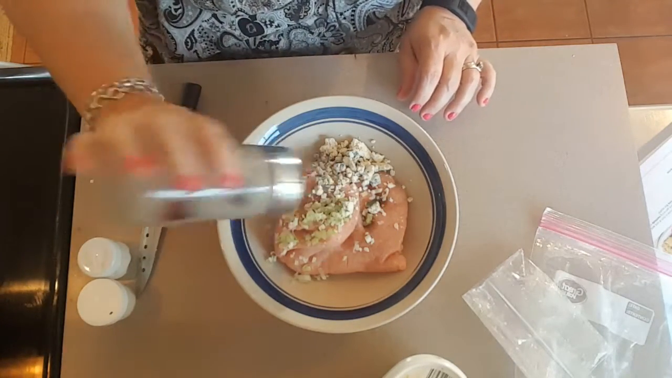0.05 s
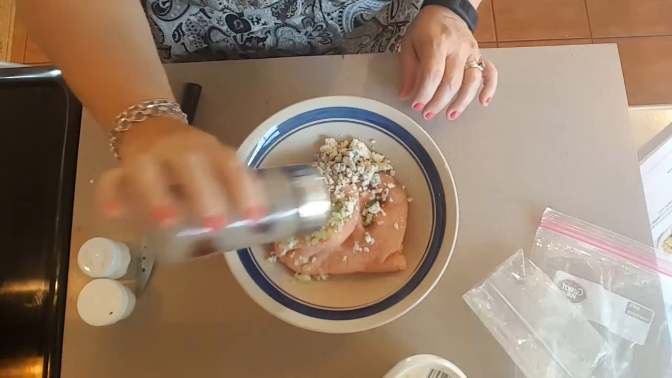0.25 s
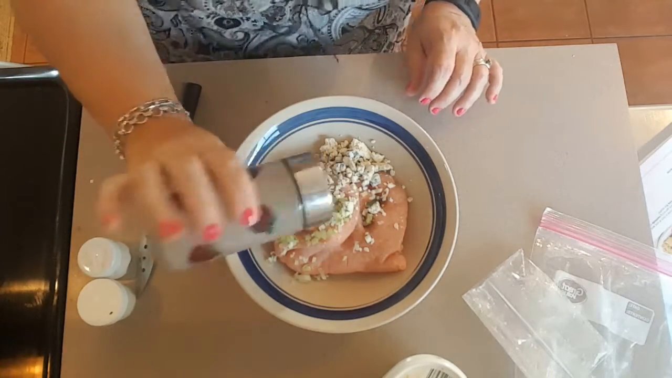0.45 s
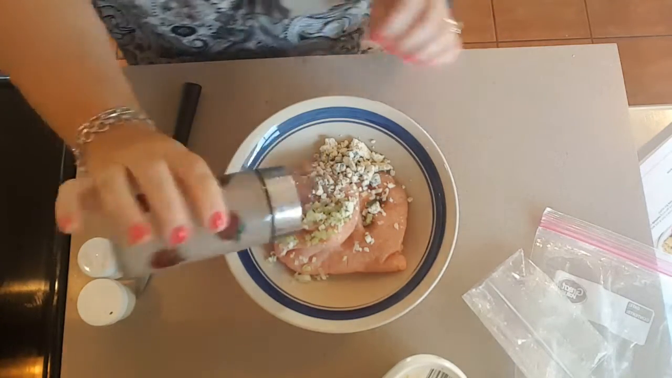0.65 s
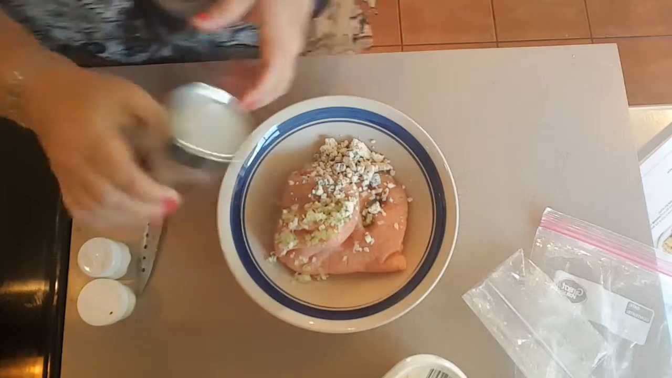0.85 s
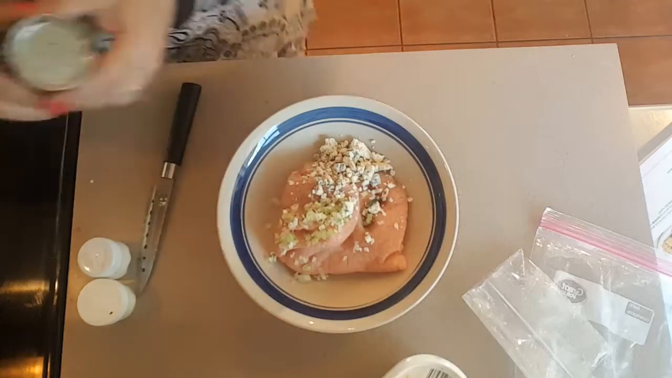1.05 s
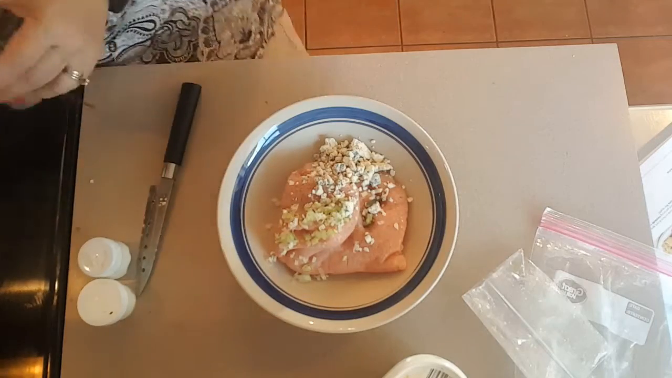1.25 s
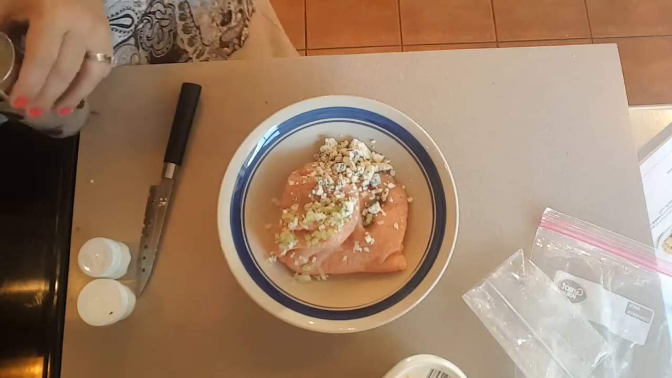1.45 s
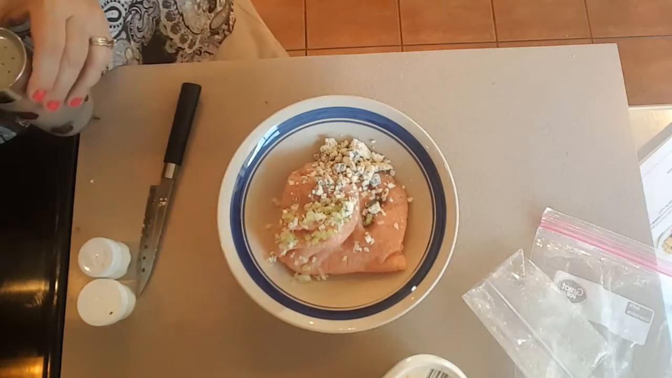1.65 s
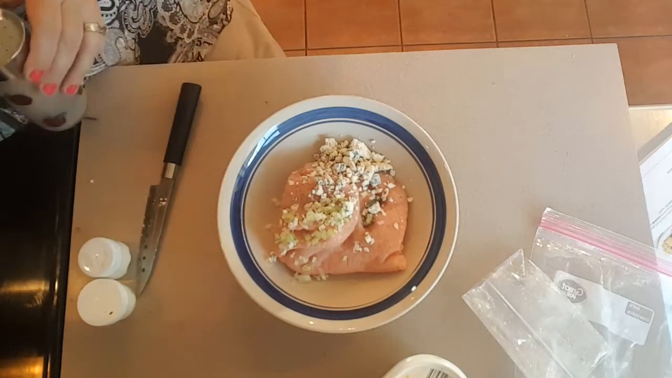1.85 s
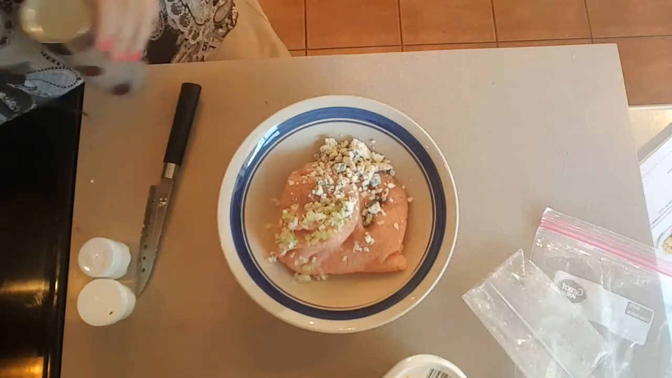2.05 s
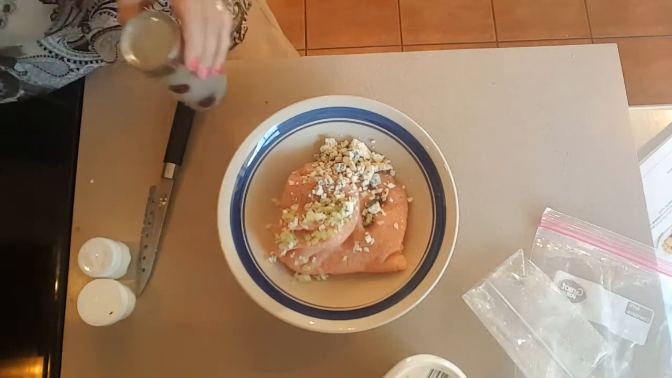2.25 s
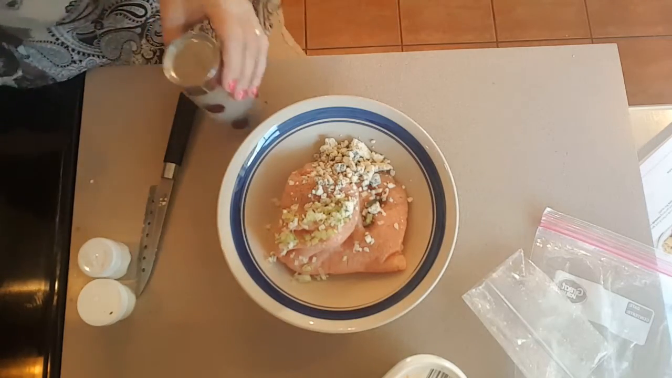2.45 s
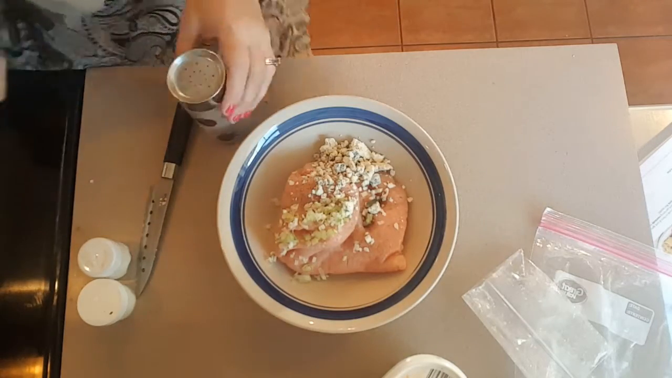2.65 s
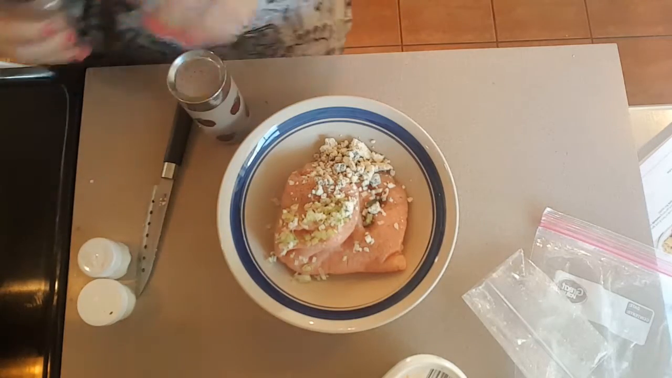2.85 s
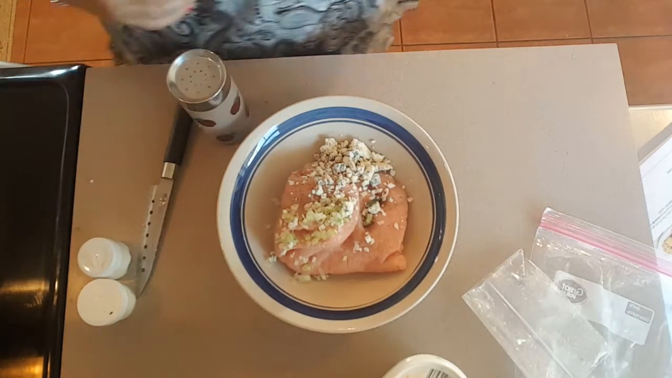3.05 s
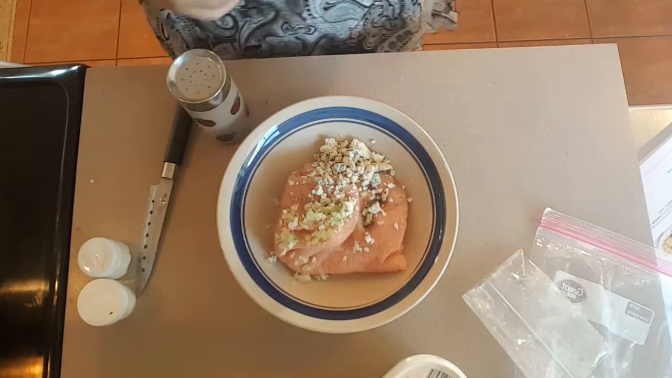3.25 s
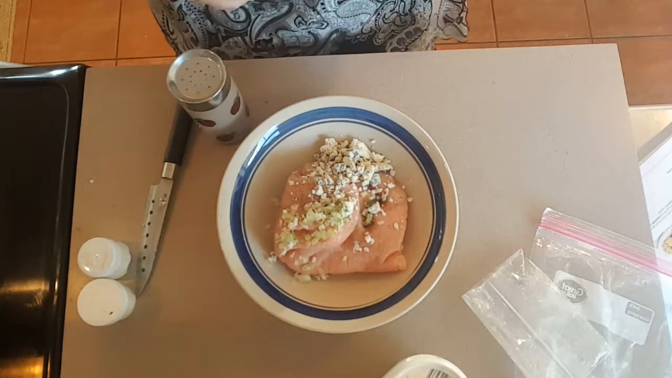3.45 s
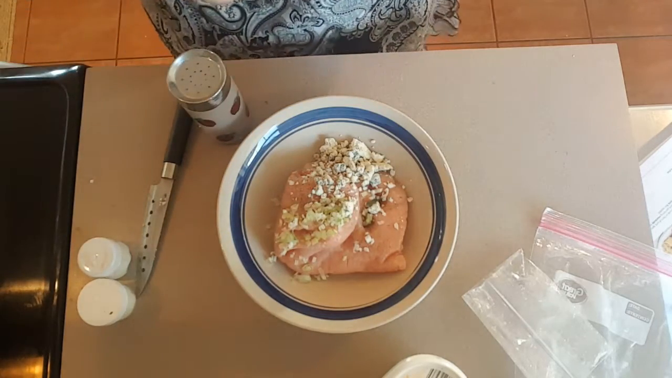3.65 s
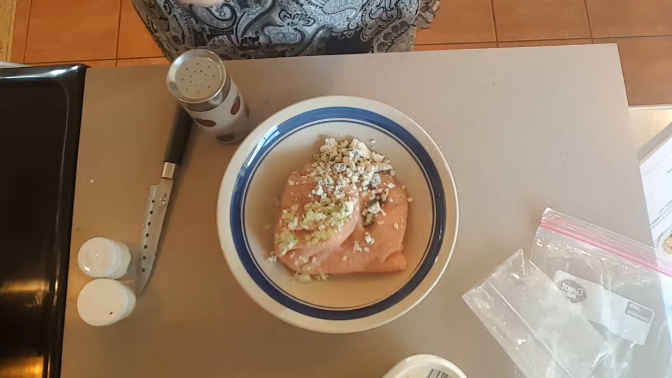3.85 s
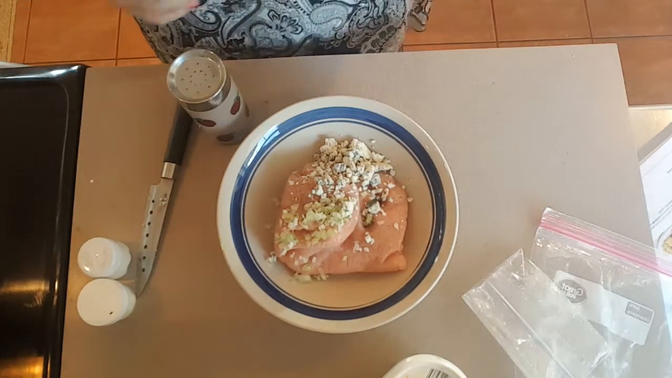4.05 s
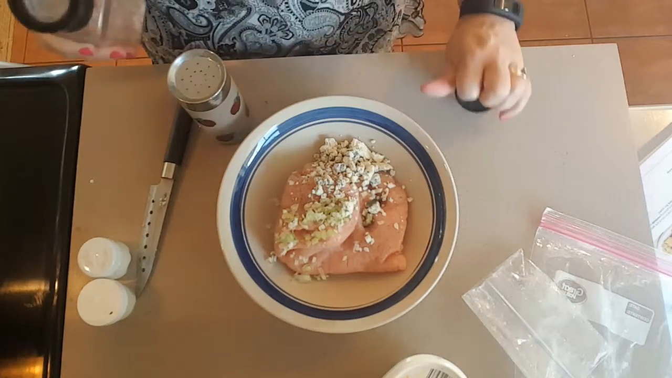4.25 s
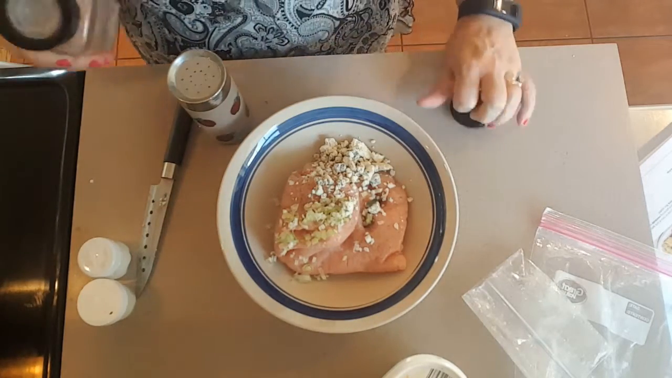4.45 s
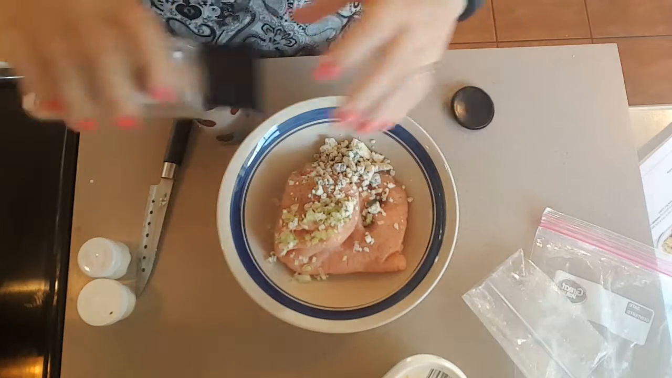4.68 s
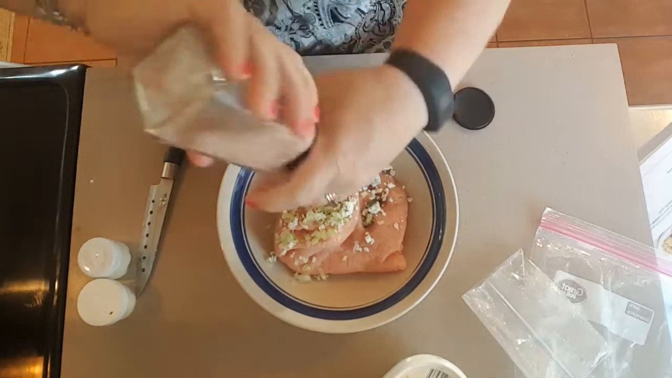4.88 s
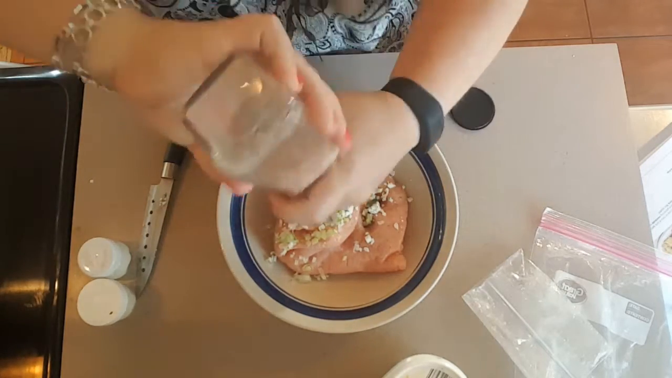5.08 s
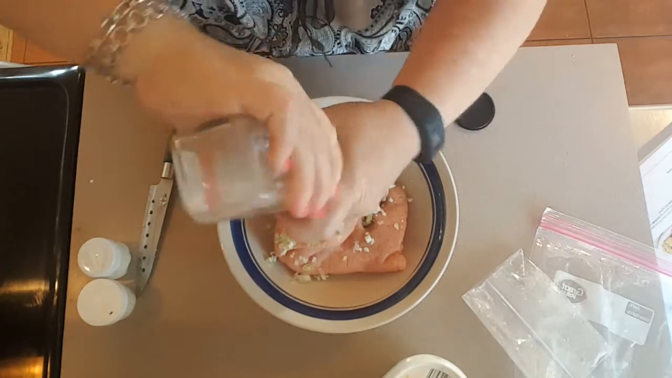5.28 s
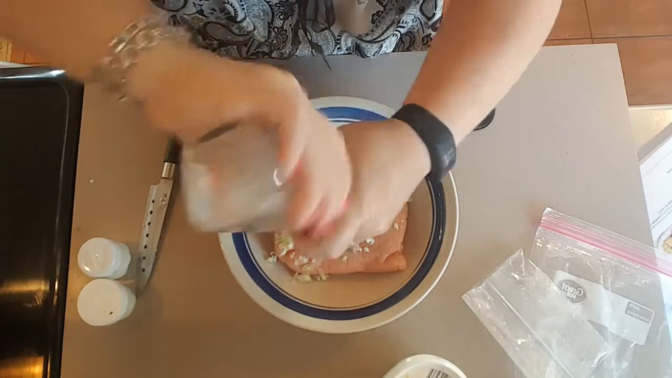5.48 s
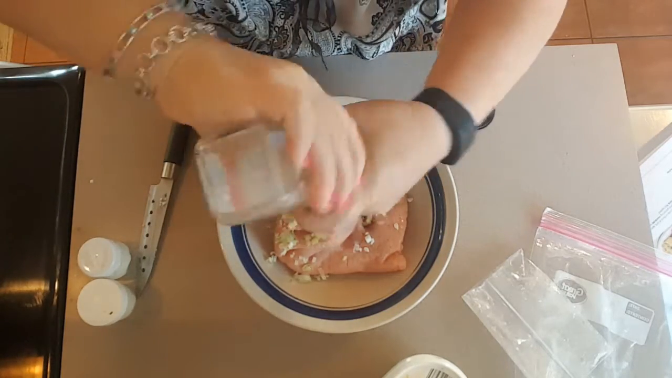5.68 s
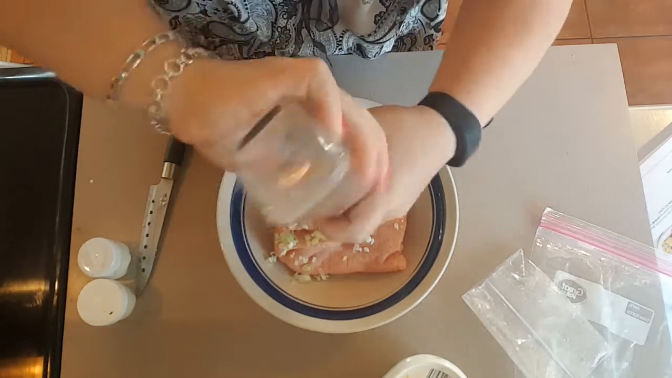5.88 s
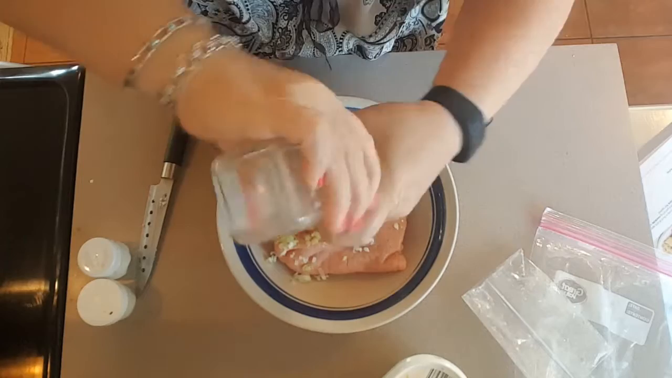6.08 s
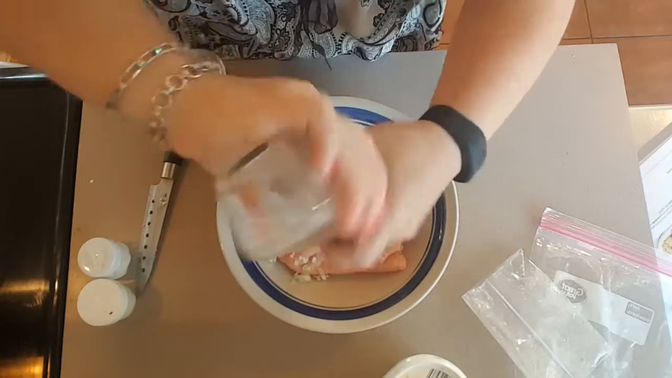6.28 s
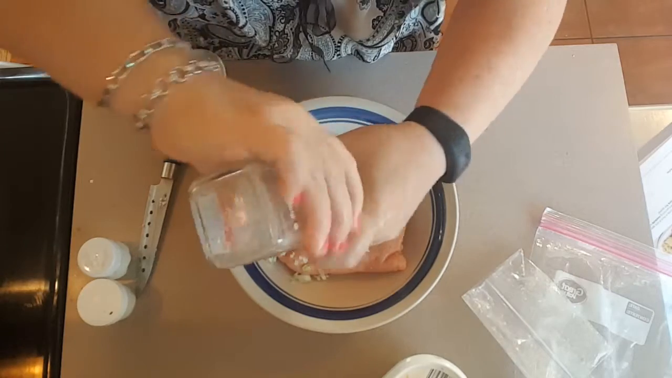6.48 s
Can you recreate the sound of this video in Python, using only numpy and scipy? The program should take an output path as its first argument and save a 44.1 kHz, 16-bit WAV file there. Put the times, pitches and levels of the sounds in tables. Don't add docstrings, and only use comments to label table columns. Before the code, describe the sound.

Faint salt shakes, a short lid scrape and a solid thud on the counter, then a plastic cap drops, peppercorns rattle and a mill crunches.

```python
import sys
import numpy as np
from scipy import signal
from scipy.fft import rfft, irfft, next_fast_len
from scipy.io import wavfile
from scipy.ndimage import uniform_filter1d

SR = 44100
rng = np.random.default_rng(int(sys.argv[2]) if len(sys.argv) > 2 else 0)


def store_wav(level_fs):
    pcm = np.round(np.clip(np.atleast_2d(level_fs), -1, 1) * 32767)
    wavfile.write(sys.argv[1], SR, pcm.T.astype(np.int16))


def decibels_to_gain(level_db):
    exponent = np.asarray(level_db, float) / 20
    return 10 ** exponent


N = 287752
TIME = np.arange(N) / SR
HZ = np.fft.rfftfreq(2 * next_fast_len(N // 2 + SR // 4, True), 1 / SR)

# frequency in Hz, level in dB.
AIR_TONE = [(15, -73), (25, -18.5), (43, -19), (64, 3), (80, -9.5), (94, -0.5), (114, -2), (185, -7),
            (293, -22), (516, -16.5), (840, -25.5), (1790, -29), (2050, -24.5), (2280, -28), (8000, -38),
            (10500, -43), (16000, -38.5)]
AIR_DB = -58
# frequency in Hz, width in Hz, level in dB.
HUMS = [(55.9, 10.7, -68.5), (119.7, 14.6, -67), (558, 110, -76)]
# start in seconds, attack in seconds, hold in seconds, release in dB per second, level in dB.
DRONE = (4.84, .1, .15, 8, -60)
DRONE_END_S = 5.75
# start, attack and hold in seconds, release in dB per second, level in dB.
SLEEVE_STIR = (-.3, .9, 6., 100, -65)
# start in seconds, level in dB.
BRUSHES = [
    (1.919, -58),
    (4.68, -51.5),
    (4.86, -56.5),
    (5.3, -59),
    (6.36, -73),
]
BRUSH_ATTACK_S, BRUSH_HOLD_S, BRUSH_RELEASE_DB_S = .06, .04, 110
# start in seconds, level in dB.
FINGERS = [(1.84, -58.5), (2.93, -65.5), (3.06, -67), (3.319, -61.5), (3.53, -61), (3.69, -67.5),
           (3.86, -64.5), (4.0, -85), (4.17, -79)]
# start in seconds, level in dB.
SQUEAKS = [(3.3, -63), (3.99, -74), (4.05, -72), (4.16, -65)]
# frequency in Hz, time to fade by 60 dB in seconds.
ROOM_FADE = [(125, 0.21), (500, 0.55), (2000, 0.42), (6000, 0.57), (10000, 0.25), (14000, 0.24)]
# frequency in Hz, left minus right in dB.
PORTS = [(60, -1.5), (200, -2), (400, -2.5), (700, -3), (1300, 1), (2400, 1), (4400, -8.5), (8000, -1.5),
         (15000, -7.5)]
PORT_BASS_RAD = 0.11

# start in seconds, can ring in dB, length in seconds, hiss over ring in dB.
SHAKES = [
    (0.174, -59, 0.038, 1),
    (0.384, -62, 0.039, 8),
    (0.596, -61, 0.028, 6),
    (0.762, -62, 0.037, -5),
    (1.053, -64, 0.021, 2),
]
# frequency in Hz, level in dB.
SALT_TONE = [(1180, -47), (2000, -28), (3200, -14), (3460, 11), (4300, -29), (4690, -6), (5250, -9),
             (13100, -11), (16000, -9.5)]
# time in seconds, level in dB.
LID_TWIST = [
    (1.865, -54),
    (1.876, -56),
    (1.889, -34.5),
    (1.907, -30.5),
    (1.96, -55),
]
# frequency in Hz, level in dB.
LID_TONE = [(59, -48), (100, -19), (206, 3), (295, -31.5), (343, 0.5), (389, -18), (608, -2.5), (850, -13),
            (1120, -5.5), (1350, -12), (1900, -9), (2250, -17.5), (2800, -24), (3500, -19.5), (4300, -31.5),
            (16000, -57)]
# time in seconds, peak in dB.
SET_DOWN = [(2.5547, -6.5), (2.559, -10), (2.5635, -14.5), (2.572, -11), (2.586, -17.5), (2.591, -13.5),
            (2.597, -17), (2.612, -17.5), (2.678, -24), (2.684, -22.5)]
# frequency in Hz, level in dB, time to fade by 60 dB in seconds.
COUNTER_RING = [(135.2, 9, 0.25), (204, -5.5, 0.14), (415, -1, 0.3), (464, -15, 0.19), (524.7, -4, 0.33),
                (571.5, -4, 0.38), (608.6, 2, 0.29), (744, -3, 0.12), (778, 0, 0.15), (922, -20, 0.033),
                (1070, -5, 0.24), (1098, -27.5, 0.092), (1190, -16.5, 0.18), (1406, -8, .08)]
# frequency in Hz, level in dB.
THUD_TONE = [(24, -49), (40, -40), (75, -11), (100, 0.5), (135, 9.5), (200, -6), (300, -20), (392, -6),
             (585, -3), (873, -6), (1090, -4.5), (1550, -16), (1760, -20), (2260, -29), (4340, -37),
             (16000, -75)]
# time in seconds, peak in dB.
LET_GO = [(2.784, -29.5), (2.803, -38), (2.812, -30), (2.822, -40), (2.833, -39), (2.877, -51)]

# time in seconds, cap knock in dB, tick in dB, left minus right in dB.
TOUCHES = [(2.966, -49.5, -63, -2), (3.1043, -79, -49, -1), (3.127, -76, -53.5, -11), (3.174, -80, -59, -7),
           (3.4271, -14, -51.5, 0), (3.566, -67, -60, 1), (3.715, -49, -68, 9), (3.7228, -31, -51, 1),
           (3.7522, -58, -58, -1), (3.77, -37.5, -52, 0), (3.882, -38, -63, 0), (3.8839, -26.5, -51, 2),
           (3.896, -46, -78, -3), (3.925, -49, -70, 0)]
# frequency in Hz, level in dB, time to fade by 60 dB in seconds.
CAP_POP = [(2073, -0.3, 0.037), (2356, -1, 0.018), (2730, -16, 0.01), (2990, -1.5, 0.0073),
           (1270, -10, 0.055)]
# frequency in Hz, width in Hz, level in dB.
TICK_TONES = [(3700, 380, 0.5), (6100, 1300, -2.5), (8460, 1700, -4.5), (12360, 5700, -20)]
# time in seconds, peak in dB.
THUMPS = [
    (2.965, -65),
    (3.4273, -38),
    (3.7221, -37),
    (3.753, -47),
]
# time in seconds, peak in dB.
HOLLOW_POPS = [
    (3.427, -36.5),
    (3.7233, -60),
    (3.7716, -73),
]
# time in seconds, peak in dB.
NAIL_CLICKS = [
    (3.7515, -41),
    (3.767, -41.5),
]
# time in seconds, peak in dB.
CREAKS = [(3.459, -44), (3.5, -50), (3.521, -55), (3.545, -58), (3.582, -62), (3.632, -52), (3.76, -50),
          (3.772, -57), (3.8, -65)]

# time in seconds, peak in dB.
LANDING = [
    (4.347, -19.5),
    (4.3509, -29.5),
    (4.357, -30),
]
# frequency in Hz, level in dB, time to fade by 60 dB in seconds.
CAP_RING = [(760, 0.5, 0.019), (1930, -9, 0.029), (2240, 13.5, 0.0078), (2570, 5.5, 0.012),
            (2740, 6.5, 0.018), (2890, 2, 0.039), (2980, -17, 0.027), (4030, -4.5, 0.017),
            (4484, 0.5, 0.03), (6320, -11, 0.021), (7200, -27, .018)]
# frequency in Hz, level in dB.
RIM_TONE = [(88, -22), (150, -0.5), (303, -10), (494, 0.5), (888, -3), (1420, -1), (1830, -12),
            (2980, -14.5), (3290, -17.5), (5910, -23.5), (6770, -26), (16000, -46)]
# time in seconds, peak in dB, length in seconds.
WOBBLE = [(4.49, -33, 0.0065), (4.498, -29.5, 0.0057), (4.578, -29.5, 0.0027), (4.583, -30, 0.0063),
          (4.65, -32, 0.0032), (4.659, -29, 0.0057), (4.712, -35, 0.0077), (4.7212, -28, 0.0053),
          (4.762, -39.5, 0.011), (4.774, -31, 0.0073), (4.82, -39.5, 0.0056)]

# start, attack and hold in seconds, release in dB per second, level in dB.
ROLLING = (4.66, .1, .08, 170, -42)
# start, attack and hold in seconds, release in dB per second, level in dB.
TRICKLE = (4.69, .12, .06, 300, -53.5)
# start, attack and hold in seconds, release in dB per second, level in dB.
PILE_UP = [
    (4.858, 0.015, 0.0087, 500, -47),
    (4.892, 0.016, 0.0054, 700, -31.5),
    (4.914, 0.0065, 0.0065, 420, -41.5),
]
PILE_RING_DB = -9
# time in seconds, peak in dB, length in seconds.
FIRST_CORNS = [
    (4.656, -50, 0.0025),
    (4.678, -42, 0.003),
    (4.694, -40, 0.0039),
    (4.711, -40, 0.0027),
    (4.7235, -32, 0.0032),
]
# frequency in Hz, width in Hz, level in dB.
GLASS_TONES = [(3480, 220, -0.5), (5880, 420, -6.5), (7580, 240, -10), (9200, 360, -25), (14500, 2400, -23)]
# frequency in Hz, level in dB.
PILE_TONE = [(590, -41), (1000, -22), (1480, -36), (1670, -5), (2010, -3.5), (2530, -13), (2620, -36),
             (2840, -7), (3460, -14), (6940, -4.5), (8850, -6.5), (11000, -9), (16000, -12)]
# time in seconds, peak in dB, length in milliseconds, dullness in dB.
CRACKS = [(5.142, -19, 2.5, 3), (5.1506, -19.5, 3.8, 2.5), (5.1565, -23, 2.9, -3.5), (5.167, -25, 2, 1),
          (5.169, -19, 4.2, -2.5), (5.183, -22, 2.3, 3), (5.1851, -18, 4, 4.5), (5.193, -34, 2.9, 1),
          (5.2106, -19.5, 3.9, 0), (5.227, -42, 3.8, -4), (5.346, -31.5, 5.2, 0.5), (5.3547, -34, 3.7, 4.5),
          (5.3622, -23.5, 1.8, 2), (5.372, -30, 3.8, 2), (5.3794, -28, 2.8, -4.5), (5.5189, -22, 5.2, 2),
          (5.5227, -22, 4.7, -0.5), (5.5364, -19.5, 4.3, -0.5), (5.539, -23.5, 6.4, 1.5),
          (5.55, -31, 2.7, 3), (5.5786, -34, 3.3, -8), (5.7232, -39, 2.4, 2), (5.7439, -30.5, 1.25, 1),
          (5.9302, -39, 2.6, -4), (5.9368, -31, 3.2, -3.5), (5.9422, -23, 2.5, -1.5), (5.957, -37, 3.1, -4),
          (5.963, -28, 2.5, 0), (5.9715, -35, 2.2, -7), (5.9759, -15.5, 2.14, 1.5), (5.98, -28, 2.6, 0),
          (5.9866, -39, 2.8, 2), (6.0074, -22.5, 2.8, -4), (6.011, -25.5, 3.2, 3.5), (6.136, -37.5, 4.4, 3),
          (6.152, -43, 2.8, 2), (6.1668, -33.5, 5.1, -4), (6.172, -30.5, 4.5, 0), (6.192, -34, 2.5, 1),
          (6.3107, -25.5, 4.8, 3), (6.32, -24, 3.7, 5), (6.327, -16.5, 2.6, -2.5),
          (6.3353, -19.5, 3.5, -2.5), (6.341, -15.5, 3.3, 1.5), (6.3441, -26, 2, -4),
          (6.3513, -14.5, 2.9, -2.5), (6.361, -25, 2.9, -8), (6.375, -41, 3, -1), (6.393, -38.5, 3.9, 3)]
# time in seconds, peak in dB.
SPLINTERS = [(5.148, -24), (5.175, -19.5), (5.18, -25), (5.19, -36), (5.199, -47), (5.216, -24),
             (5.221, -34), (5.236, -30), (5.528, -31), (5.544, -22.5), (5.557, -28), (5.947, -27),
             (5.952, -30), (5.968, -41), (5.999, -35), (6.014, -29), (6.018, -31), (6.024, -41),
             (6.03, -42), (6.314, -26), (6.324, -25), (6.331, -17.5), (6.338, -19), (6.347, -21),
             (6.357, -23), (6.364, -29), (6.382, -29), (6.387, -29)]
# start in seconds, end in seconds, level in dB,
# brightness of its cracks in dB, body of its cracks in dB.
TURNS = [(5.143, 5.215, -42.5, 4, -0.5), (5.34, 5.389, -42, 1.5, 3), (5.5, 5.508, -48, 1, -5),
         (5.516, 5.564, -36, 1.5, -0.2), (5.705, 5.76, -53, -1.5, -5.5), (5.928, 6.028, -49, 2, -1),
         (6.147, 6.2, -47, -2.5, 1), (6.306, 6.366, -46, -3.5, -0.5), (6.497, 6.502, -48.5, 19, -2)]
BODY_DB, BODY_SLOPE, EDGE_DB, EDGE_SLOPE, MIDDLE_DB = -9.5, -0.24, -11.5, 0.15, -26
# frequency in Hz, level in dB.
MILL_TONE = [(120, -15), (200, -8), (305, -17.5), (558, -4), (696, -14), (1040, -7.5), (1590, -1.5),
             (1910, 0), (2330, 0), (3830, -5.5), (5630, -3), (6170, -4.5), (16000, -22.5)]
# frequency in Hz, width in Hz, level in dB.
MILL_RING = [(1090, 190, -7), (1850, 120, -1), (4370, 190, -23), (4530, 150, -7.5), (5540, 310, -1),
             (7740, 1700, -9)]
# start in seconds, hollow in dB, falling dust in dB.
GRIP = [
    (5.13, 0, -50),
    (5.33, -0.5, -60),
    (5.5, -8, -57),
    (5.7, -14, -70),
    (5.92, -7, -51),
    (6.12, -15, -57),
    (6.3, -4, -52),
]
GRIP_SHIFT, DUST_LATE_S, DUST_RELEASE_DB_S = 0.024, 0.037, 97


def through(x, gain):
    return irfft(rfft(x, 2 * len(HZ) - 2) * gain)[..., :N]


def colour(points):
    hz, db = np.transpose(points)
    cepstrum = irfft(np.log(decibels_to_gain(np.interp(np.log(HZ + 1), np.log(hz), db))))
    cepstrum[1:len(HZ) - 1] *= 2
    cepstrum[len(HZ):] = 0
    gain = np.exp(rfft(cepstrum))
    return gain / np.sqrt(np.mean(np.abs(gain) ** 2))


def peaks(rows):
    return sum(decibels_to_gain(db) * 1j * HZ * w / (hz ** 2 - HZ ** 2 + 1j * HZ * w) for hz, w, db in rows)


def modes(rows):
    total = 0
    for hz, db, t60 in rows:
        width = np.log(1000) / np.pi / np.clip(t60, .005, .3)
        total = total + decibels_to_gain(db) * SR / (2 * np.pi) * hz / (hz ** 2 - HZ ** 2 + 1j * HZ * width)
    return total


def bursts(s, db, length, rise=0.):
    out, span = np.zeros(N + 4096), np.arange(4096) / SR
    noise = rng.standard_normal((len(s), 4096))
    noise = noise * np.abs(noise) ** .3
    lengths = np.clip(np.broadcast_to(length, len(s)), 1e-4, 1)
    for t, g, d, n in zip(s, decibels_to_gain(db), lengths, noise):
        n = n * np.exp(-span / d) * (1 - np.exp(-(span + 1 / SR) / (rise * d + 1e-6)))
        first = int(t * SR)
        out[first:first + 4096] += g * n * np.sqrt(d * SR / 8 / np.sum(n ** 2))
    return out[:N]


def grains(rate, spread_db):
    happens = rng.random(N) < rate / SR
    strength = rng.standard_normal(N)
    x = happens * strength * decibels_to_gain(spread_db * np.minimum(rng.exponential(size=N), 3.2))
    return x / x.std()


def taps(s, db, soft_hz):
    x = np.bincount((np.asarray(s) * SR).astype(int), decibels_to_gain(np.asarray(db)), N)
    return through(x, 1 / (1 + 1j * HZ / soft_hz) ** 3 * (1j * HZ / (1j * HZ + 55)) ** 2)


def scattered(source, *args, **kw):
    return np.array([source(*args, **kw), source(*args, **kw)])


def curve(rows, off=-120):
    return np.interp(TIME, *np.transpose(rows), off, off)


def swell(start, attack, hold, release, db):
    rise = np.clip((TIME - start) / attack, 0, 1) ** 2
    return rise * decibels_to_gain(db - release * np.maximum(TIME - start - attack - hold, 0))


def brush_swells(rows, release=BRUSH_RELEASE_DB_S):
    return sum(swell(s, BRUSH_ATTACK_S, BRUSH_HOLD_S, release, db) for s, db in rows)


def place(x, pan_db, lag, shade_db):
    shift = np.exp(-1j * np.pi * HZ * lag / SR) * decibels_to_gain(shade_db / 2 * HZ / (HZ + 5000))
    panned = x * decibels_to_gain(np.multiply.outer([.5, -.5], pan_db + 0 * TIME))
    return through(panned, np.array([shift, 1 / shift]))


def room(x):
    t, tail, bins = TIME[:SR], 0, np.arange(SR // 2 + 1) + 1.
    fade_hz, fade_s = np.transpose(ROOM_FADE)
    for hz in 62.5 * 2 ** np.arange(9):
        t60 = np.interp(np.log(hz), np.log(fade_hz), fade_s)
        band = np.exp(-2 * np.log2(bins / hz) ** 2)
        mid, side = irfft(rfft(rng.standard_normal((2, SR))) * band)
        pair = mid + min(hz / 1000.0, 1) * side * np.array([[1], [-1]])
        tail = tail + pair * (1000 ** (-t / t60) + decibels_to_gain(10.0) * 1000 ** (-t / 0.022))
    tail = tail * (1 - np.exp(-t / 0.002))
    gain = rfft(tail)
    even = uniform_filter1d(np.abs(gain), size=120) / (np.abs(gain) + 1e-9)
    tail = irfft(gain * even ** .8)
    tail = tail * np.clip((.46 - t) / .26, 0, 1) * np.clip(t / .001, 0, 1)
    x = through(x, 1j * HZ / (1j * HZ + 170))
    return signal.fftconvolve(x[None], tail / np.sqrt(np.sum(tail ** 2) / 2), axes=1)[:, :N]


def kitchen_air():
    mid, side = through(rng.standard_normal((2, N)), colour(AIR_TONE))
    side = through(side, 1 / np.sqrt(1 + (700 / (HZ + 150)) ** 2))
    air = decibels_to_gain(AIR_DB - 3.0) * (mid + 0.82 * side * np.array([[1], [-1]]))
    for hz, width, db in HUMS:
        hum = through(rng.standard_normal(N), peaks([(hz, width, 0)]) ** 2)
        air = air + decibels_to_gain(db) * hum / hum.std()

    cloth_tone = peaks([(1080, 1060, 3.1), (505, 200, 9.9)]) / (1 + 1j * HZ / 6000)
    cloth = through(rng.standard_normal((2, N)), cloth_tone)
    air = air + (swell(*SLEEVE_STIR) + brush_swells(BRUSHES)) * cloth / cloth.std()
    skin_tone = peaks([(2000, 640, 1.5), (2900, 1700, 1.0), (6300, 2400, -18.5), (13700, 3600, -18)])
    skin = through(scattered(grains, 2700, 1.4), skin_tone)
    air = air + brush_swells(FINGERS) * skin / skin.std()
    squeak = through(scattered(grains, 900, 2.6), peaks([(2035, 42, 5), (2800, 190, -7), (1480, 97, -4)]))
    air = air + brush_swells(SQUEAKS, release=250) * squeak / squeak.std()

    drone_end = np.clip((DRONE_END_S - TIME) / 0.12, 0, 1)
    drone = decibels_to_gain(6) * swell(*DRONE) * drone_end * np.sin(2 * np.pi * 92 * TIME)
    rumble = through(rng.standard_normal(N), peaks([(83, 54, 0)]) ** 2)
    drone = drone + swell(5.88, 0.14, .5, 30, -63.0) * rumble / rumble.std()
    return (air + drone) * decibels_to_gain(np.array([[.3], [-.3]]))


def shaker():
    can_swell, hiss_swell = 0, 0
    for start, db, length, hiss_db in SHAKES:
        slide = decibels_to_gain(db) * np.exp(-.5 * ((TIME - start - length / 2) / (length / 2)) ** 2)
        can_swell = can_swell + slide
        hiss_swell = hiss_swell + decibels_to_gain(hiss_db) * slide
    salt = decibels_to_gain(-6.5) * through(can_swell * scattered(grains, 6800, 1.8), colour(SALT_TONE))
    hiss_tone = peaks([(4700, 250, 1), (7000, 2500, -4), (13200, 1500, 3.5)])
    salt = salt + decibels_to_gain(-9) * through(hiss_swell * scattered(grains, 6000, 2.2), hiss_tone)

    lid_ring = modes([(610, 2.0, 0.11), (512, -1, .1), (1044, 2, 0.31), (1180, -17, .06)])
    scrape = decibels_to_gain(curve(LID_TWIST)) * grains(4000, 0.74)
    lid = decibels_to_gain(-6.0) * through(scrape, colour(LID_TONE) + decibels_to_gain(-32) * lid_ring)

    s, db = np.transpose(SET_DOWN)
    thud = decibels_to_gain(17.0) * through(taps(s, db, 12000.), colour(THUD_TONE))
    ring = decibels_to_gain(-18.0) * through(taps(s, db, 2950.0), modes(COUNTER_RING))
    rim_tone = peaks([(4550, 2400, -10.0), (7900, 1160, 10.0), (13000, 3000, -18)])
    thud = thud + through(bursts(s[:1], [-41.5], 0.0034), rim_tone)
    boom = modes([(145, -15.0, 0.12), (194, -0.5, 0.035), (449.0, -6.0, 0.075)])
    thud = thud + through(taps(*np.transpose(LET_GO), 730.0), boom)
    return [(salt, .3, -3., -.3, -6.), (lid, -.3, 6., -.3, 3.),
            (-thud, -.3, 4., -.3, 1.5), (-ring, -.3, 4., -.3, -3.)]


def handling():
    s, db, tick_db, pan_db = np.transpose(TOUCHES)
    x = decibels_to_gain(-1.0) * through(taps(s, db, 3330.0), modes(CAP_POP) * peaks([(2340, 840, 0)]))
    thump = taps(*np.transpose(THUMPS), 580.0)
    x = x + decibels_to_gain(3.0) * through(thump, modes([(148, -1.8, 0.16), (188, -0.44, 0.063)]))
    hollow = modes([(555, 5.0, 0.04), (756, -8, 0.031)]) * peaks([(504, 490, 0)])
    x = x + decibels_to_gain(15.0) * through(taps(*np.transpose(HOLLOW_POPS), 1150.0), hollow)
    x = through(x, 1 + decibels_to_gain(-8.0) * np.exp(-2j * np.pi * HZ * 0.002692))

    x = x + decibels_to_gain(12.0) * through(bursts(s, tick_db, 0.0064), peaks(TICK_TONES))
    nail = bursts(*np.transpose(NAIL_CLICKS), 0.0048, rise=.3)
    x = x + through(nail, decibels_to_gain(15.5) * peaks([(3070, 240, 0)]))
    creak = bursts(*np.transpose(CREAKS), 0.013, rise=.3)
    creak_tone = peaks([(540, 100, -1), (990, 200, 1), (1360, 140, -0.42), (2250, 200, -2.7)])
    x = x + through(creak, decibels_to_gain(12) * creak_tone)
    x = x + decibels_to_gain(9) * taps(s, tick_db, 14000.)
    return [(x, np.interp(TIME, s, pan_db), 1.5, -.3, -8.5)]


def cap():
    gaps = (1 - peaks([(3370, 380, -1.5)])) * (1 - peaks([(6040, 270, -1.0)]))
    gaps = gaps * 1j * HZ / (1j * HZ + 500)
    ring = decibels_to_gain(-13.0) * modes(CAP_RING) + decibels_to_gain(-13.0) * colour(RIM_TONE)
    land = through(taps(*np.transpose(LANDING), 24000.0), gaps * ring)
    land = land + through(bursts([LANDING[0][0]], [-40], 0.0035), peaks([(13600, 3400, 2.3)]))

    scuff = decibels_to_gain(2.5) * through(scattered(bursts, *np.transpose(WOBBLE), rise=0.46), colour(RIM_TONE))
    s, db, _ = np.transpose(WOBBLE)
    tick_tone = peaks([(3000, 900, -11), (4400, 500, 0.5), (6500, 2300, -6), (12000, 6000, -12)])
    scuff = scuff + decibels_to_gain(-9) * through(bursts(s, db, .0012), tick_tone)
    return [(land, .3, -4., -.3, 1.5), (scuff, .3, -4., -.3, -3.)]


def sliding_corns():
    heap = sum(swell(*row) for row in PILE_UP)
    rattle = (swell(*ROLLING) + decibels_to_gain(PILE_RING_DB) * heap) * scattered(grains, 2800, 3.5)
    roll = decibels_to_gain(13.5) * through(rattle, peaks(GLASS_TONES) * (1 - peaks([(2600, 660, -1.5)])))
    pile = decibels_to_gain(1.5) * (swell(*TRICKLE) + heap) * scattered(grains, 12000, 0.94)
    pile = pile + decibels_to_gain(0.5) * bursts(*np.transpose(FIRST_CORNS))
    slide = through(roll + through(pile, colour(PILE_TONE)), 1 - peaks([(2580, 240, -.3)]))
    return [(slide, .3, -1.5, -.3, -3.)]


def cracking_corns():
    s, db, ms, dull_db = np.transpose(CRACKS)
    length = np.maximum(ms, 1.2) / 1000
    turns = np.array(TURNS)
    turn = turns[np.searchsorted(turns[:, 1], s)]
    body_db = BODY_DB + BODY_SLOPE * (db - MIDDLE_DB) + turn[:, 4] + dull_db
    edge_db = EDGE_DB + EDGE_SLOPE * (db - MIDDLE_DB) + turn[:, 3] - dull_db
    low, high = 1 / (1 + (HZ / 3000) ** 4), 1 / (1 + (7000 / (HZ + 1)) ** 4)
    crack = through(bursts(s, db + body_db, length, rise=0.02), decibels_to_gain(4.5) * low)
    crack = crack + through(scattered(bursts, s, db + edge_db, length, rise=0.046), decibels_to_gain(11.5) * high)
    crack = crack + through(scattered(bursts, s, db, length, rise=0.096), 1 - low - high)
    s, db = np.transpose(SPLINTERS)
    return crack + decibels_to_gain(-5.0) * scattered(bursts, s, db, 0.0018, rise=0.02)


def grinding_mill():
    turning = sum(decibels_to_gain(db) * (TIME > start) * (TIME < end) for start, end, db, *_ in TURNS)
    grit = uniform_filter1d(turning, size=60) * scattered(grains, 5000, 2.2)
    force = decibels_to_gain(6.0) * cracking_corns() + grit

    lean = np.interp(TIME, np.array(CRACKS)[:, 0], rng.random(len(CRACKS))) * np.pi / 2
    lower, upper = [peaks(np.multiply(MILL_RING, [1 + way * GRIP_SHIFT, 1, 1])) for way in (-1, 1)]
    body = force + through(force * np.cos(lean), lower) + through(force * np.sin(lean), upper)
    s, hollow_db, dust_db = np.transpose(GRIP)
    hollow = decibels_to_gain(hollow_db[np.searchsorted(s[1:], TIME)])
    body = body + through(force * hollow, decibels_to_gain(-2) * peaks([(1080, 220, 0)]))

    falling = sum(swell(t + DUST_LATE_S, 0.029, 0.025, DUST_RELEASE_DB_S, g) for t, g in zip(s, dust_db))
    dust = falling * scattered(grains, 7000, 2.5)
    dust = through(dust, peaks([(8400, 2800, 0.0), (13000, 4300, -9)]))
    return [(through(body, colour(MILL_TONE)) + dust, .3, -3., -.3, -5.)]


def scene():
    sources = shaker() + handling() + cap() + sliding_corns() + grinding_mill()
    direct = sum(place(x, *where) for x, *where, _ in sources)
    into_room = sum(x.reshape(-1, N)[0] * decibels_to_gain(wet_db) for x, *_, wet_db in sources)
    return direct + room(into_room) + kitchen_air()


def band_limit(x):
    return signal.sosfilt(signal.butter(12, 16970, fs=SR, output="sos"), x)


def record(dry):
    hz, db = np.transpose(PORTS)
    bass_turn = np.exp(.5j * PORT_BASS_RAD / (1 + (HZ / 160) ** 2))
    left = decibels_to_gain(np.interp(np.log(HZ + 1), np.log(hz), db) / 2) * bass_turn
    x = through(dry, np.array([left, 1 / left]))
    top_cut = signal.ellip(12, .2, 75, 15700, fs=SR, output="sos")
    return band_limit(signal.sosfilt(top_cut, x))


dry = scene()
out = record(dry)
store_wav(out)
```